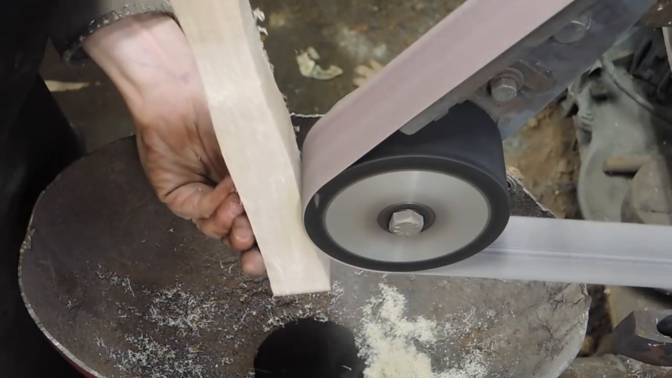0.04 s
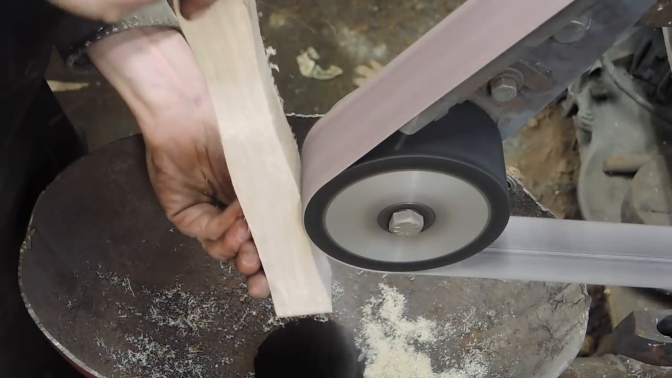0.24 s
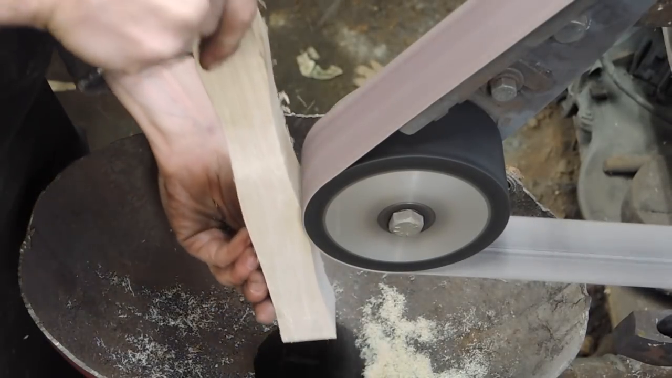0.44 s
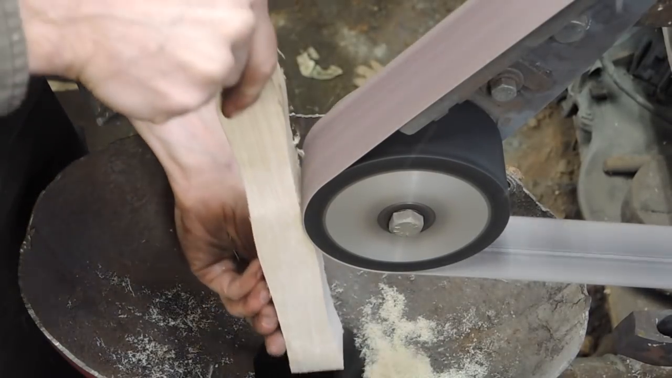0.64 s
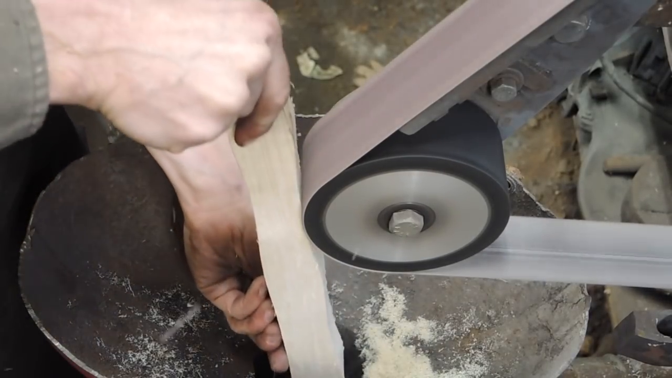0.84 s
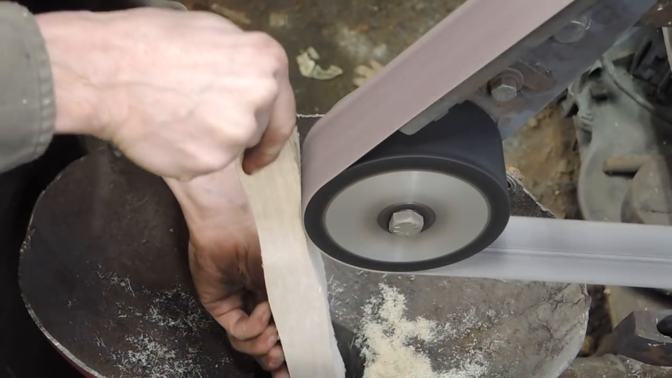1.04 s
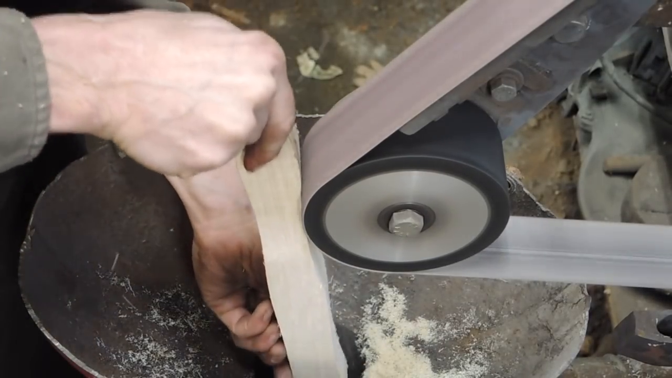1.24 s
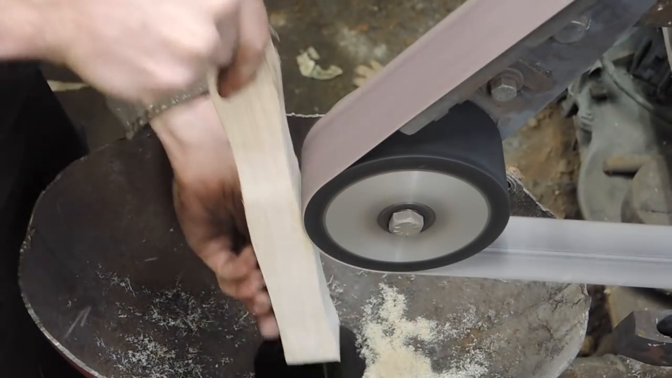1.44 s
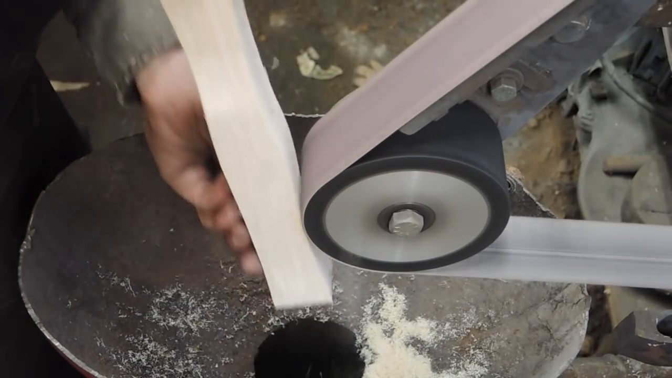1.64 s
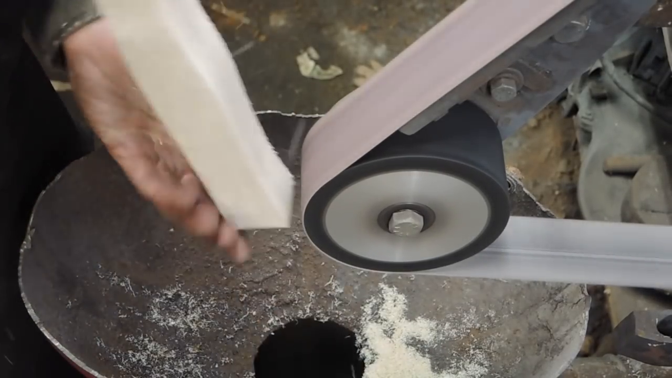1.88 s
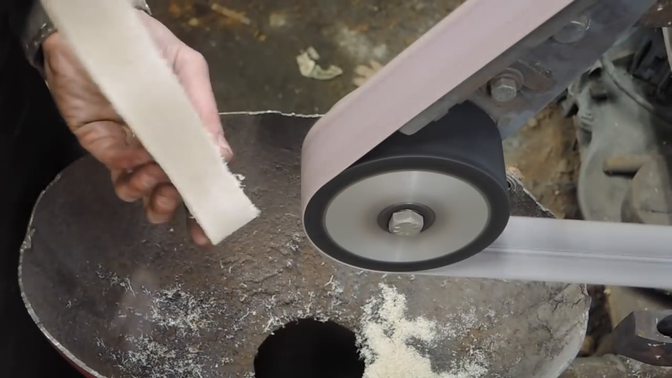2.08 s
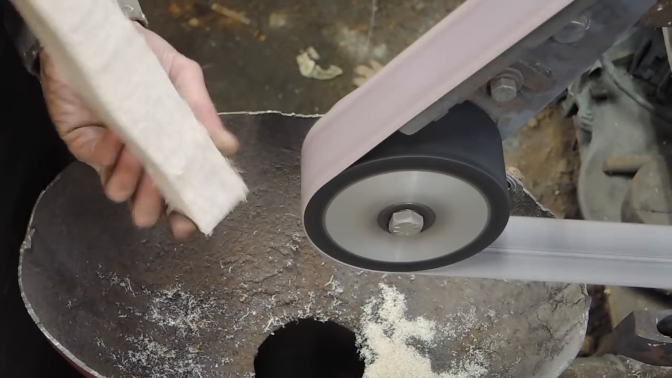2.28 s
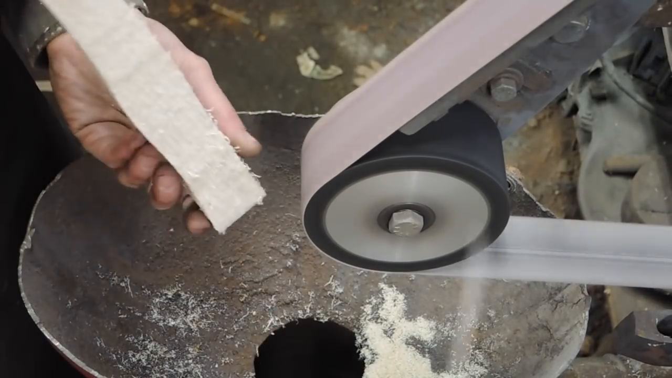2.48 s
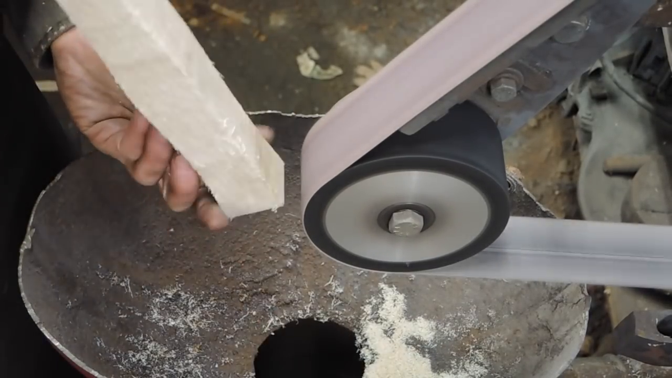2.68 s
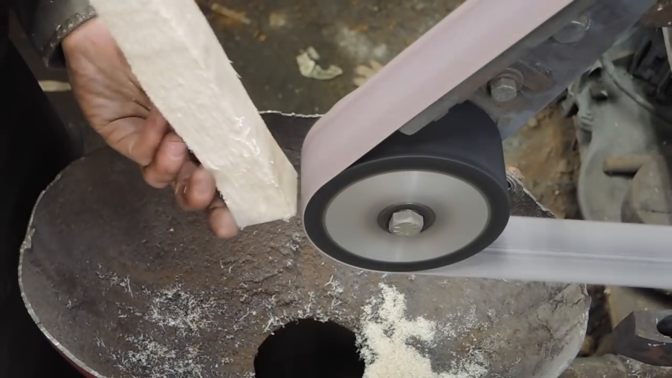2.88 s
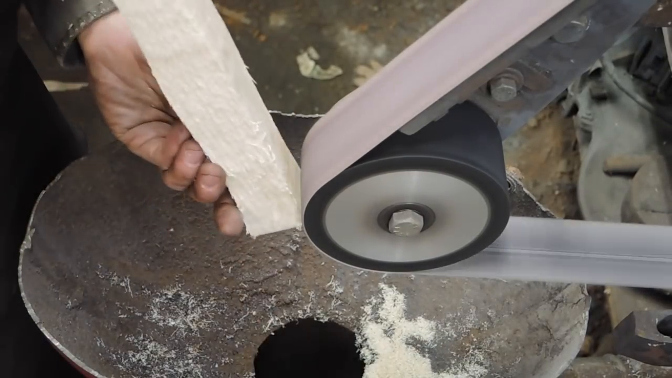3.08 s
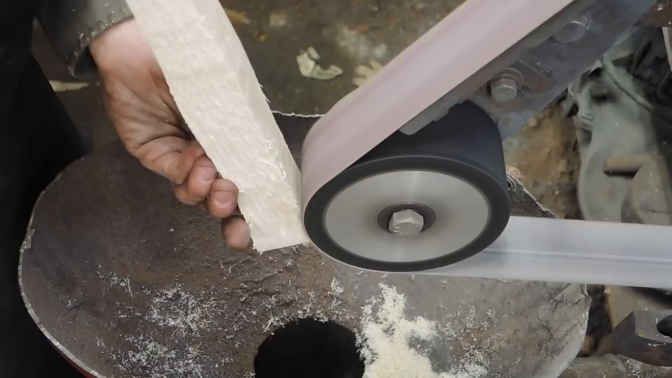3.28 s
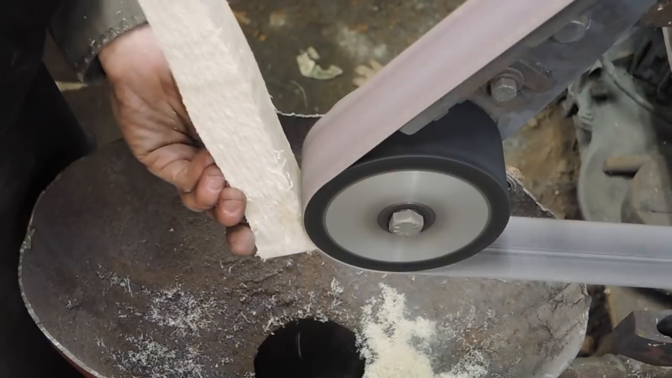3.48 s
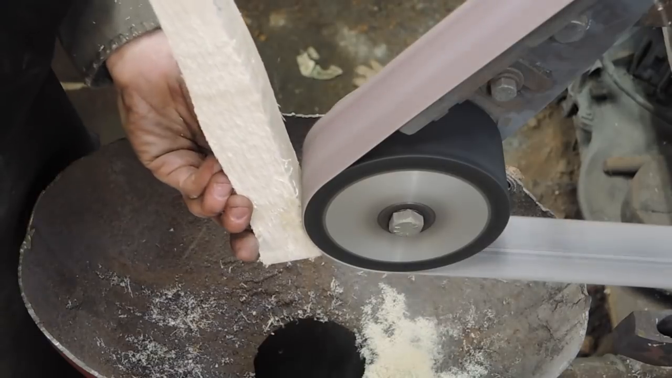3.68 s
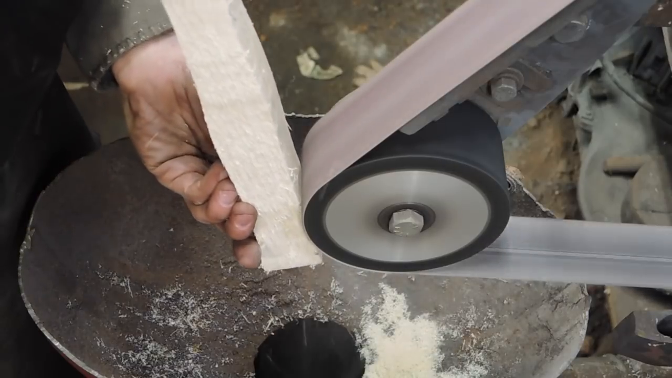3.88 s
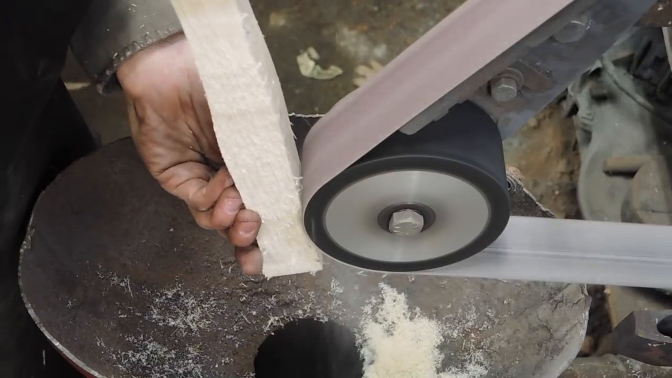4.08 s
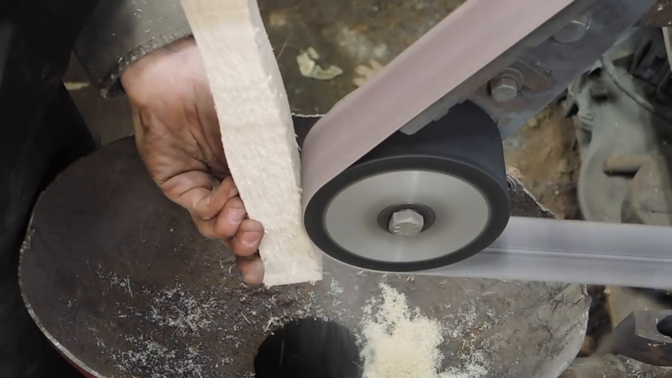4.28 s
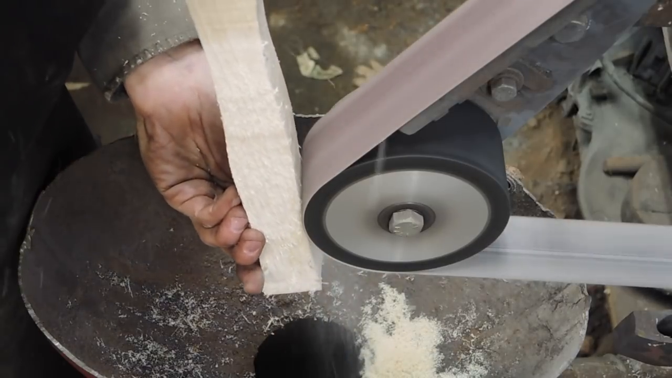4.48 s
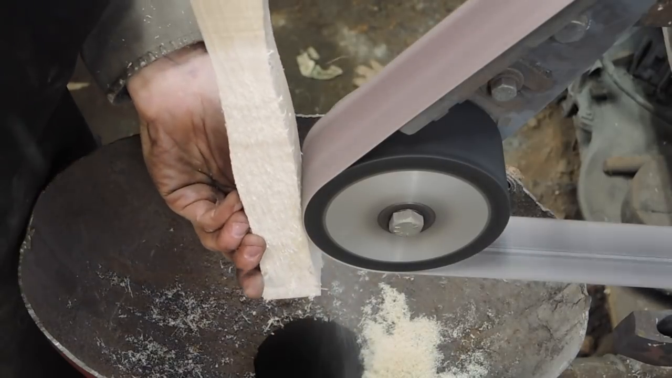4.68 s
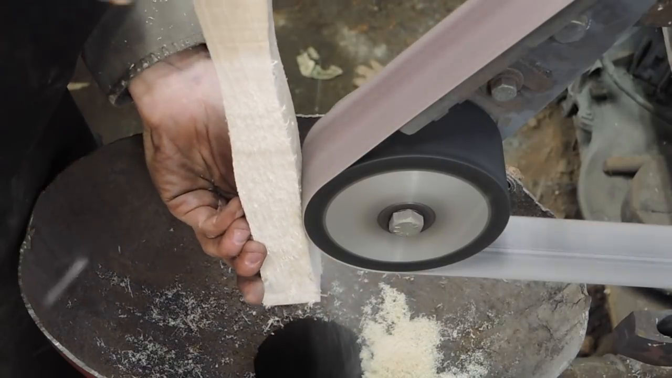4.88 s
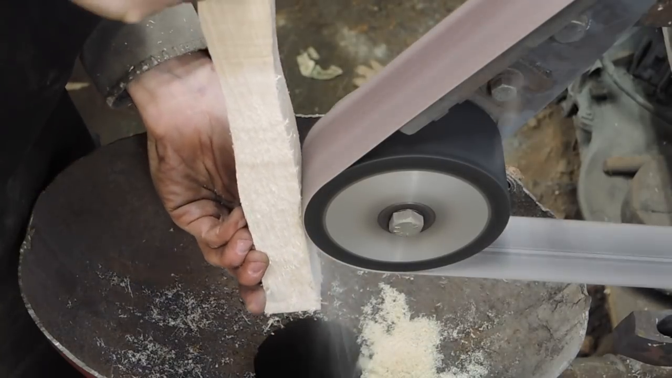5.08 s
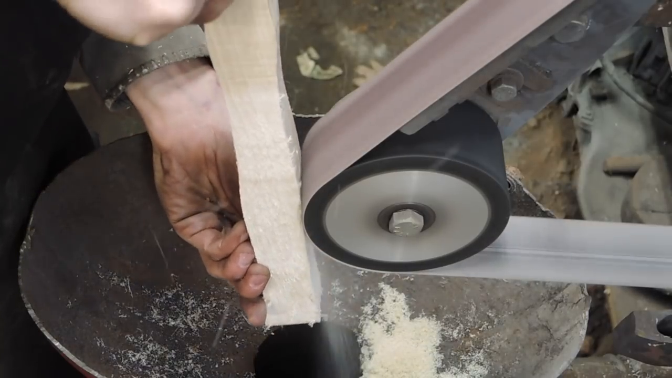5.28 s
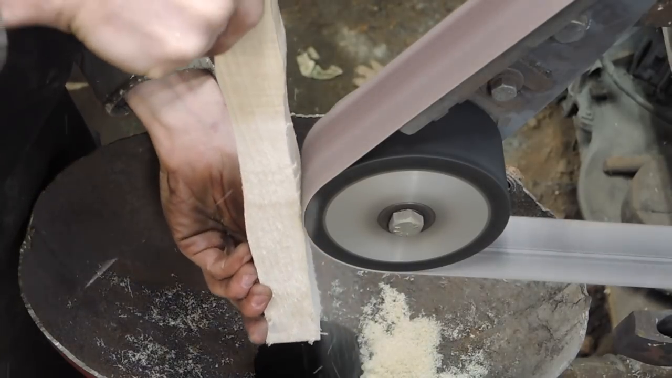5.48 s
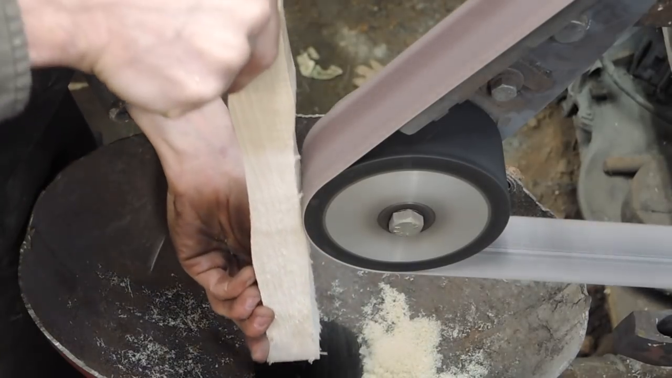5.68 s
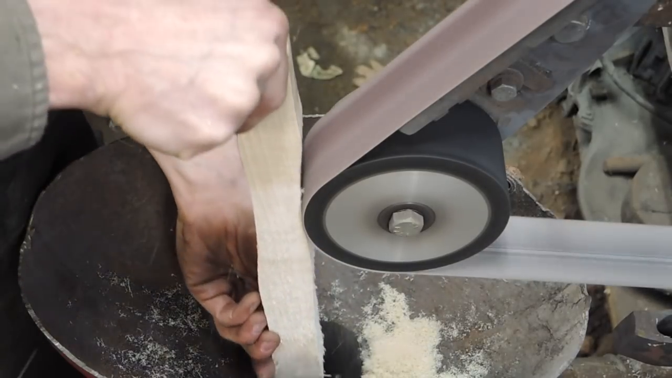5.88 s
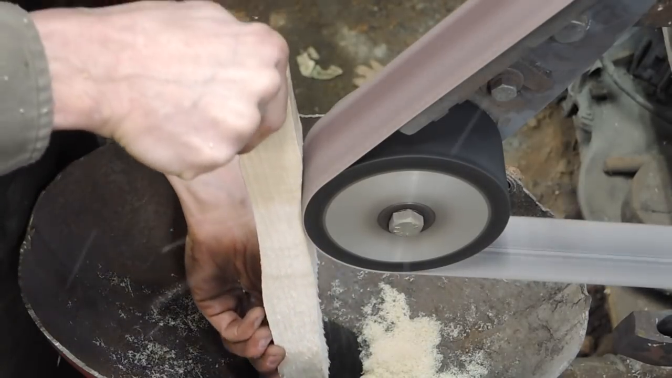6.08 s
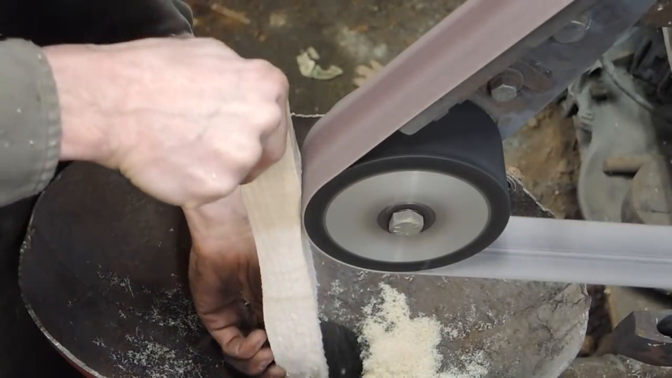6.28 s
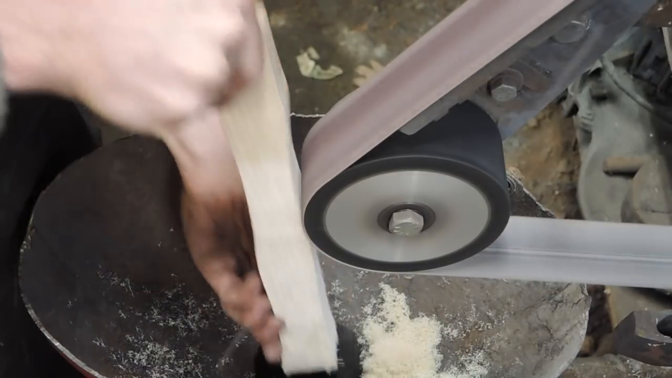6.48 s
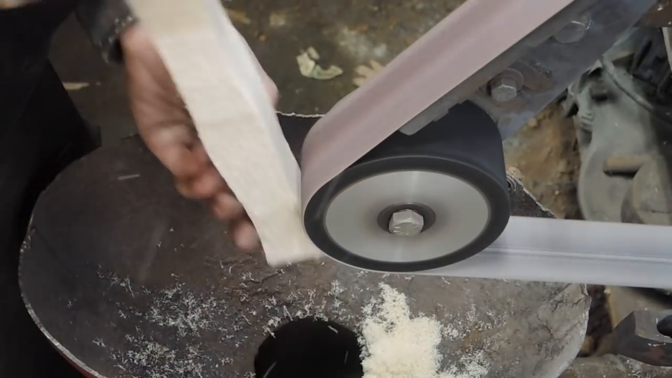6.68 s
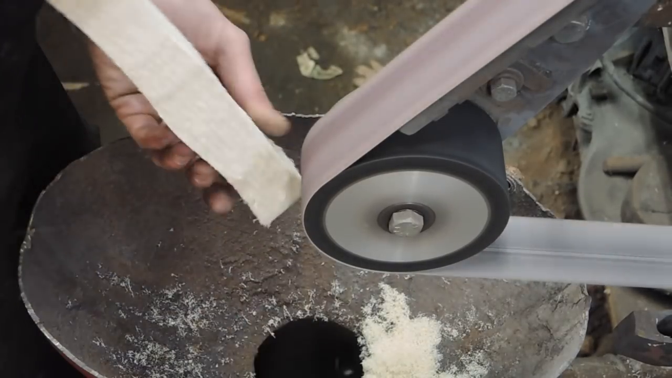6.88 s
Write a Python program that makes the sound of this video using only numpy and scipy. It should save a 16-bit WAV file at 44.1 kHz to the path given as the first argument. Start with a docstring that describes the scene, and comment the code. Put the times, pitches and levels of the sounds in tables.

```python
"""A plank already tears and rings on a belt grinder, lifts off at 1.7 s, and is pressed on again from 3 to 6.66 s.
Cutting: noise that swells and fades slightly with belt sharpness, plus two plank resonances. Belt: hiss that
nearly repeats every lap, with short splice ticks at the wheels. Motor: whine on shaft orders and broad rumble,
beside mains hum at 60 Hz and other machine hums. Under load the motor slows a little and the belt judders.
Heard close by at a small two-port microphone."""
import sys
import numpy as np
from scipy import signal
from scipy.fft import rfft, irfft
from scipy.io import wavfile
from scipy.ndimage import uniform_filter1d, map_coordinates

SR = 44100
rng = np.random.default_rng(int(sys.argv[2]) if len(sys.argv) > 2 else 0)


def output_pcm(signal):
    """Save a mono or channel-first signal as 16-bit PCM at the path in sys.argv[1].

    Samples are clipped to [-1, 1] before scaling.
    """
    pcm = np.clip(np.atleast_2d(signal).T, -1, 1) * 32767
    wavfile.write(sys.argv[1], SR, np.round(pcm).astype(np.int16))


def gain_from_db(level_db):
    """Convert decibel levels to linear amplitude factors (20 dB per decade)."""
    decades = np.asarray(level_db, float) / 20
    return 10 ** decades


N = 306054

# Motor whine. Each row: shaft order, mean level in dB.
WHINE_ORDERS = [(1, -63), (2, -61.5), (3, -59), (4, -64), (16, -65), (18, -58.5), (19, -62), (21, -58.5),
                (24, -59), (25, -71), (26, -54), (27, -52), (28, -57.5), (29, -53.5), (30, -45.5),
                (31, -49), (32, -52.5), (33, -49), (34, -64), (35, -52.5), (36, -58.5)]
# Mains hum at 60 Hz, and other steady or wavering machine hums. Each row: frequency in Hz, waver limit in dB
# either way, level in dB.
HUMS = [(60, .6, -67), (74.5, 1.5, -61.5), (143, 2.5, -55), (261.7, 0.5, -64), (549.5, 5, -53),
        (652, 2.5, -64), (1008, 2.5, -63.5)]
# Motor and air rumble. Each row: frequency in Hz, mid density in dB per Hz, side against mid in dB.
RUMBLE_SPECTRUM = [(30, -100, -22), (55, -85, -22), (100, -82, -26), (151, -75.5, -21), (332, -75.5, -23.5),
                   (535, -75.5, -13), (836, -79, -24), (1220, -73.5, -16), (1980, -70.5, -14.5),
                   (2135, -75, -22), (3030, -105, -30)]
# Belt hiss at the ports, before the low cut at the first row. Each row: frequency in Hz, left density in
# dB per Hz, right density in dB per Hz, likeness 0 to 1, left lead in rad.
BELT_PORTS = [(2180, -69, -67, 1, 0), (2920, -68, -69.5, 1, -0.2), (3500, -66, -65, 0.62, 0.15),
              (4200, -64.5, -64.5, 0.64, 0.65), (5250, -62.5, -63, 0.82, 0.66),
              (6070, -60.5, -64, 0.45, 0.52), (7000, -54.5, -54.5, 1, 1.36), (7900, -49, -53.5, 0.7, 2),
              (8630, -53.5, -52, 0.97, 2.5), (9280, -59, -59, 0.7, 2), (9900, -65, -56, 0.72, 3),
              (11250, -66, -61.5, 0.48, 2), (12240, -67, -67.5, 0.9, 1.5), (14000, -75, -73, 0.5, 5.5)]
# Wheel and frame resonances in the belt hiss. Each row: frequency in Hz, width in Hz, gain on the hiss in dB.
FRAME_RINGS = [(4400, 60, -2.5), (4740, 110, 4), (5440, 60, 1.5), (6200, 75, 4), (6660, 83, 0),
               (7430, 69, -1), (7560, 70, -0.5), (7480, 100, 1.5), (9150, 58, 7.5), (9820, 120, 3.5),
               (10200, 130, 3.5)]
# Splice passing the wheels. Each row: share of the lap, ring in Hz, t60 in seconds, mean level in dB.
SPLICE_TICKS = [ (.1, 3790, .075, -28), (.56, 7000, 0.0097, -24), (0.619, 2894, 0.018, -30.5),
                (.72, 3836, 0.03, -30)]
# Plank contact. Each row: start in seconds, end in seconds.
CONTACTS = [(-1, 1.7), (3, 6.66)]
# Cutting level. Each row: time in seconds, hiss below 10 kHz in dB, fizz above 10 kHz in dB.
CUT_LEVELS = [(0, -21, -31), (.5, -22.5, -33), (1.15, -22, -34.5), (1.3, -26, -38), (1.5, -29, -39),
              (1.62, -24.5, -35), (1.76, -26, -40), (1.88, -41, -41), (2.05, -43, -48), (3.1, -34, -44),
              (3.2, -29, -27), (3.7, -23.5, -36), (4.5, -23.5, -34), (4.85, -24.5, -31), (5.1, -23, -31),
              (5.75, -23.5, -32), (6.25, -25.5, -28), (6.4, -30, -29), (6.63, -25, -37), (6.76, -39, -43),
              (6.94, -41, -44)]
# An edge or corner meets the belt. Each row: time in seconds, fizz boost in dB.
EDGE_FIZZ = [(.47, 4), (.68, 10), (.89, 3), (1.07, 8), (1.21, 11), (1.37, 4), (3.24, 0), (5.62, 2),
             (6.28, 3)]
# Cutting spectrum at the ports; only its shape within hiss and within fizz counts. Each row: frequency in Hz,
# left in dB per Hz, right in dB per Hz, likeness 0 to 1, left lead in rad.
CUT_PORTS = [(2300, -76, -80, 1, 0), (4070, -68.5, -74, 1, 0.65), (5370, -70, -63, 0.74, 0.98),
             (6250, -56.5, -60, 0.46, 0.0054), (7300, -53, -69, 1, 0.68), (8300, -55, -52, 0.89, 0.92),
             (9400, -58, -62, 1, 0.073), (11000, -65, -61.5, 0.51, 0.54), (12100, -65.5, -61.5, 0.37, 0.26),
             (14200, -66, -65.5, 0.35, .1)]
# Plank rings as grip and contact point move. Each row: time in seconds, upper ring in dB, lower ring in dB,
# lower ring frequency in Hz.
PLANK_RINGS = [(0, -35, -48, 1353), (.5, -35.5, -43.5, 1320), (.85, -39, -45, 1266), (1.12, -36, -47, 1297),
               (1.25, -40, -58, 1290), (1.5, -40, -44, 1280), (1.75, -36, -48, 1292), (2.1, -50, -66, 1320),
               (3.09, -44, -56, 1286), (3.13, -42, -39, 1289), (3.24, -40, -37, 1288),
               (3.65, -43, -38.5, 1268), (3.9, -51, -43, 1255), (4.45, -41, -49, 1307),
               (4.75, -39, -47.5, 1307), (5.45, -39, -38.5, 1343), (5.65, -45, -43, 1340),
               (5.95, -36, -47, 1253), (6.15, -38.5, -45, 1255), (6.38, -39, -54, 1280),
               (6.62, -42, -43.5, 1283), (6.78, -41, -60, 1348), (6.94, -50, -47, 1336)]

IDLE_HZ, LOADED_HZ, TURNS_PER_LAP, MOTOR_LAG_S = 59.15, 58.9, 4.678, 0.141
UPPER_HZ, UPPER_WIDTH_HZ = 2910, 700
LOWER_WIDTH_HZ, DAMPED_WIDTH_HZ = 62, 220
HELD_DB, FREE_DB = -48, -38
EDGE_SIGMA_S = 0.029


def gain_along(hz, points_hz, db):
    """Gain that gives unit white noise the density db per Hz."""
    return gain_from_db(np.interp(np.log(hz), np.log(points_hz), db)) * np.sqrt(SR / 2)


def unit(x):
    """Scale to rms 1."""
    return x / np.sqrt(np.mean(x ** 2))


def curve(table):
    """Columns of a table joined by straight lines in time."""
    s, *columns = np.transpose(table)
    t = np.arange(N) / SR
    return [np.interp(t, s, column) for column in columns]


def walk(rate_hz):
    """Random levels held 1 / rate_hz and slewed twice; rms 1."""
    held = max(int(SR / rate_hz), 2)
    steps = np.repeat(rng.standard_normal(N // held + 1), held)
    slewed = uniform_filter1d(uniform_filter1d(steps, held), held)
    return unit(slewed[:N])


def per_lap(lap, keep, size):
    """Chance written along the belt in size cells; each lap correlates by keep with the one before; rms 1."""
    keep = np.clip(keep, 0, .99)
    fresh = rng.standard_normal((100, size))
    laps = signal.lfilter([np.sqrt(1 - keep ** 2)], [1, -keep], fresh, axis=0)
    cells = laps[8:].ravel()  # the first laps only settle the filter
    return unit(map_coordinates(cells, [lap * size], order=3, mode="nearest"))


def ring(x, hz, width_hz):
    """One resonance, gain 1 at the centre."""
    return signal.lfilter(*signal.iirpeak(hz, hz / width_hz, SR), x)


def ports(table, near, around):
    """Both ports hear the near sound, the left one ahead in phase; the right also hears sound from around."""
    hz = np.fft.rfftfreq(N, 1 / SR) + 1  # keeps the logarithm finite
    at_hz, left_db, right_db, like, lead_rad = np.transpose(table)
    like = np.interp(hz, at_hz, np.clip(like, 0, 1))
    delayed = np.exp(-1j * np.interp(hz, at_hz, lead_rad)) * rfft(near)
    left = gain_along(hz, at_hz, left_db) * rfft(near)
    right = gain_along(hz, at_hz, right_db) * (like * delayed + np.sqrt(1 - like ** 2) * rfft(around))
    low_cut = 1 / (1 + (at_hz[0] / hz) ** 8)
    return irfft(low_cut * np.array([left, right]), N)


def nearby(x, echo_db, t60_s):
    """Bench, bowl and walls return short decaying echoes that roughen the spectrum."""
    t = np.arange(4096) / SR
    echoes = gain_from_db(echo_db) * rng.standard_normal(len(t)) * np.exp(-np.log(1000) * t / t60_s)
    echoes[0] = 1
    echoes = echoes / np.sqrt(np.sum(echoes ** 2))
    return signal.fftconvolve(x, echoes[None])[:, :N]


def motor(turns):
    """Shaft orders that waver, mains and other machine hums, and broad rumble; almost alike at both ports."""
    apart = np.array([[1], [-1]])
    t = np.arange(N) / SR
    whine = 0
    for order, db in WHINE_ORDERS:
        # a short left lead makes higher orders differ more in phase
        phase = 2 * np.pi * (order * turns + rng.random()) + 0.0091 * order * apart
        whine = whine + gain_from_db(db + 1.4 * walk(9)) * np.sqrt(2) * np.sin(phase)
    hum = 0
    for hz, waver_db, db in HUMS:
        level = gain_from_db(db + waver_db * np.tanh(walk(16)))
        hum = hum + level * np.sqrt(2) * np.sin(2 * np.pi * hz * t + 0.14 * waver_db * walk(9))
    hz = np.fft.rfftfreq(N, 1 / SR) + 1
    at_hz, mid_db, side_db = np.transpose(RUMBLE_SPECTRUM)
    mid, side = (irfft(gain_along(hz, at_hz, db) * rfft(rng.standard_normal(N)), N)
                 for db in (mid_db, mid_db + side_db))
    return whine + hum + mid + side * apart


def belt(lap, load):
    """Backing and grit hiss over the wheels, much the same on every lap; under load the belt judders."""
    place = lap + 2 + load * 5e-4 * walk(30) + 6e-5 * walk(5)  # laps
    patches = gain_from_db(0.23 * per_lap(place, 0.95, size=50))
    pair = []
    for _ in range(2):
        hiss = .85 * per_lap(place, .95, size=3400) + .52 * rng.standard_normal(N)
        frame = sum((gain_from_db(db) - 1) * ring(hiss, hz, width_hz) for hz, width_hz, db in FRAME_RINGS)
        pair.append(unit(patches * (hiss + frame)))
    return ports(BELT_PORTS, *pair)


def splice(lap):
    """The belt joint strikes each wheel once a lap and excites a short decaying ring."""
    out = 0
    t = np.arange(4096) / SR
    for share, hz, t60_s, db in SPLICE_TICKS:
        hits = np.diff(np.floor(lap - share), prepend=0) > 0
        blows = hits * gain_from_db(db + 2.45 * rng.standard_normal(N))
        envelope = np.exp(-np.log(1000) * t / t60_s) * (1 - np.exp(-t / 0.0012))
        tick = np.sin(2 * np.pi * hz * t) * envelope
        out = out + signal.fftconvolve(blows, tick)[:N]
    return out


def tearing(lap, sharp, hiss_db, fizz_db):
    """Grit tears fibres in noisy bursts, slightly harder where the belt is sharp."""
    bursts = gain_from_db(0.93 * walk(900) + 3.4 * np.clip(walk(200) - 1.5, 0, 1))
    heard = ports(CUT_PORTS, *(sharp * bursts * rng.standard_normal((2, N))))
    hiss, fizz = (unit(signal.sosfilt(signal.butter(4, 10000, kind, fs=SR, output="sos"), heard))
                  for kind in ("low", "high"))
    return gain_from_db(hiss_db) * hiss + gain_from_db(fizz_db) * fizz


def upper_ring(lap, sharp):
    """Belt roughness drives a broad plank resonance of two equal stages."""
    drive = sharp * per_lap(lap, 0.57, size=1500)
    once = ring(drive, UPPER_HZ, UPPER_WIDTH_HZ)
    return unit(ring(once, UPPER_HZ, UPPER_WIDTH_HZ))


def lower_ring(lap, sharp, lower_db, lower_hz):
    """The low plank ring moves with the grip and throbs as the same high spots of the belt come round."""
    # a slow complex wobble carried on the moving centre is a narrow band of noise around it
    shake = sharp * (per_lap(lap, 0.73, size=200) + 1j * per_lap(lap, 0.8, size=200))
    narrow, wide = (signal.lfilter(*signal.butter(1, width_hz / SR), shake)
                    for width_hz in (LOWER_WIDTH_HZ, DAMPED_WIDTH_HZ))
    # a loud ring is free; a quiet one is held down by the hand, wider and evener
    free = np.clip((lower_db - HELD_DB) / (FREE_DB - HELD_DB), 0, 1)
    wobble = free * narrow / np.std(narrow) + np.sqrt(1 - free ** 2) * wide / np.std(wide)
    throb = gain_from_db(2.9 * free * per_lap(lap, 0.88, size=4))
    carrier = np.exp(2j * np.pi * np.cumsum(lower_hz) / SR)
    return unit((throb * wobble * carrier).real)


def cutting(lap, hiss_db, fizz_db, upper_db, lower_db, lower_hz):
    """Belt sharpness slightly swells and fades the tearing noise and both plank rings together."""
    sharp = gain_from_db(0.93 * per_lap(lap, 0.75, size=30) + 0.57 * walk(7.3))
    upper = gain_from_db(upper_db) * upper_ring(lap, sharp)
    lower = gain_from_db(lower_db) * lower_ring(lap, sharp, lower_db, lower_hz)
    return tearing(lap, sharp, hiss_db, fizz_db) + upper + lower


def scene():
    """The plank loads the motor, whose speed sags after a lag and drives belt and whine."""
    t = np.arange(N) / SR
    touch = sum(1. * (t >= start) * (t < end) for start, end in CONTACTS)
    keep = np.exp(-1 / (MOTOR_LAG_S * SR))
    load = signal.lfilter([1 - keep], [1, -keep], touch, zi=[keep * touch[0]])[0]
    turns = np.cumsum(IDLE_HZ - load * (IDLE_HZ - LOADED_HZ)) / SR
    lap = turns / TURNS_PER_LAP
    hiss_db, fizz_db = curve(CUT_LEVELS)
    # the finest grit fizzes up at edges and corners
    fizz_db = fizz_db + sum(db * np.exp(-.5 * ((t - s) / EDGE_SIGMA_S) ** 2) for s, db in EDGE_FIZZ)
    contact = cutting(lap, hiss_db, fizz_db, *curve(PLANK_RINGS))
    grinder = belt(lap, load) + splice(lap) + contact
    return nearby(grinder, echo_db=-41, t60_s=.1) + motor(turns)


def low_pass(x):
    """Removes everything above the highest recorded frequency."""
    return signal.sosfilt(signal.butter(12, 14940, fs=SR, output="sos"), x)


def record(dry):
    """The recorder cuts the top steeply above 14070 Hz."""
    top_cut = signal.ellip(10, .2, 80, 14070, fs=SR, output="sos")
    mix = signal.sosfilt(top_cut, dry)
    return low_pass(mix)


dry = scene()
out = record(dry)
output_pcm(out)
```